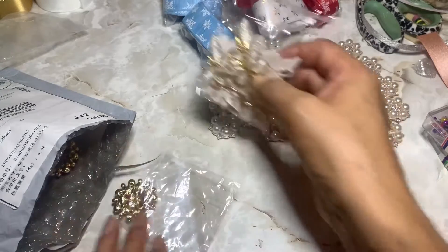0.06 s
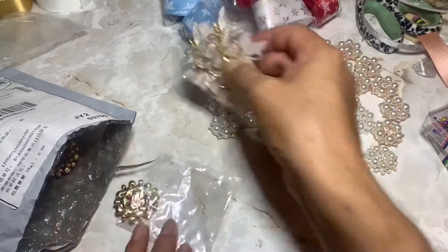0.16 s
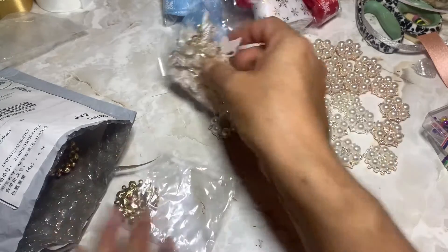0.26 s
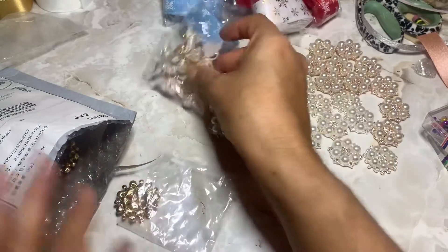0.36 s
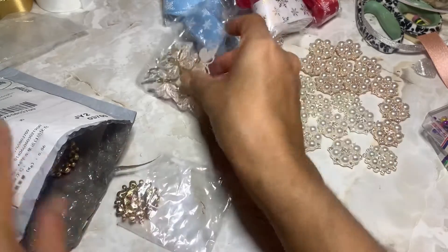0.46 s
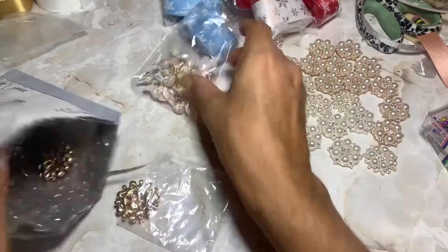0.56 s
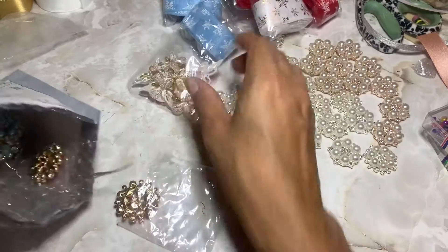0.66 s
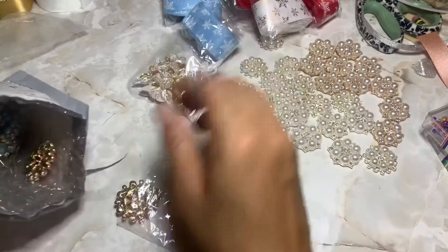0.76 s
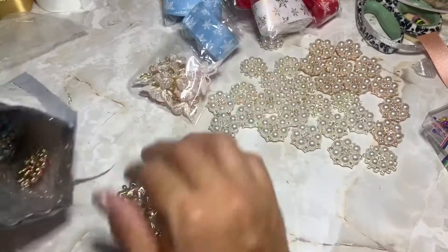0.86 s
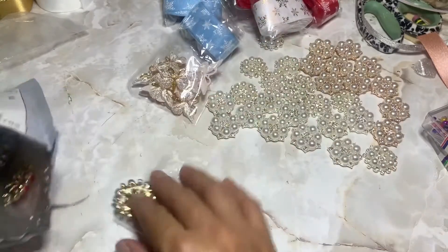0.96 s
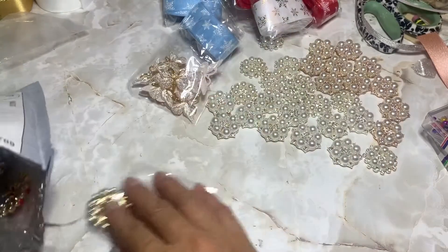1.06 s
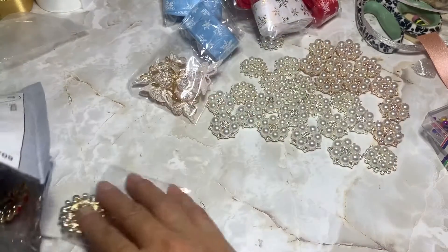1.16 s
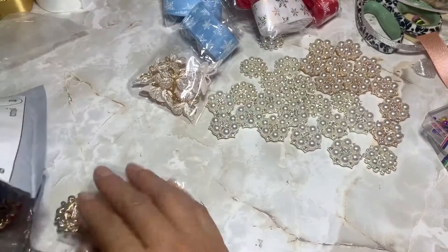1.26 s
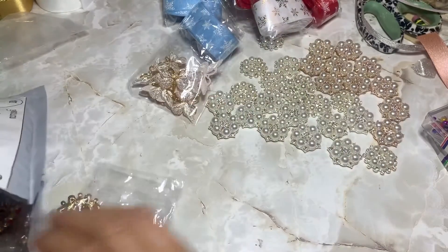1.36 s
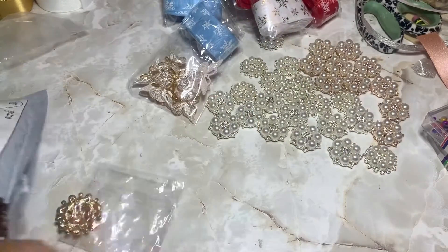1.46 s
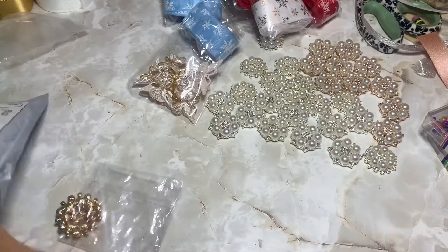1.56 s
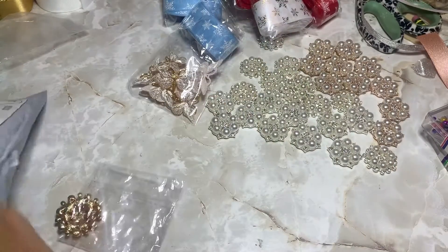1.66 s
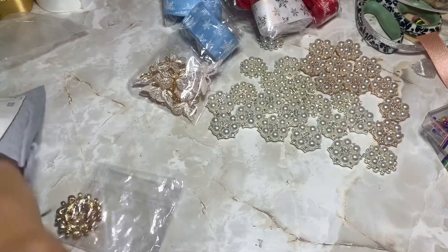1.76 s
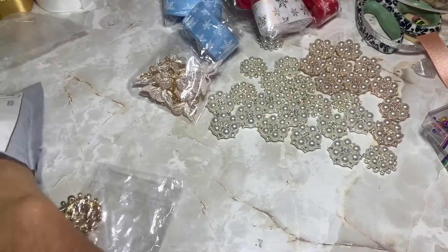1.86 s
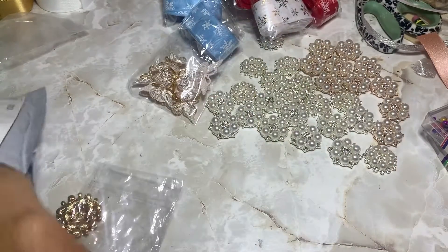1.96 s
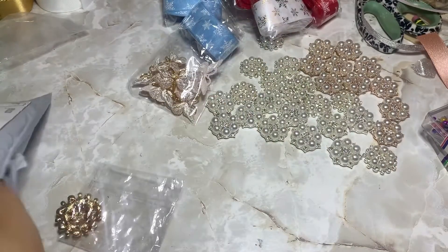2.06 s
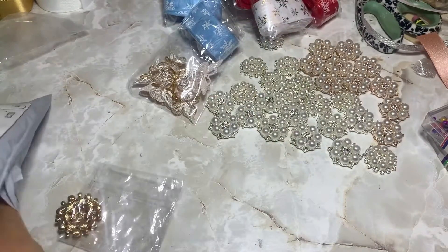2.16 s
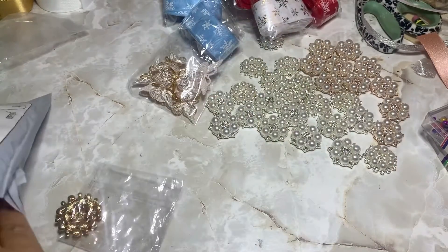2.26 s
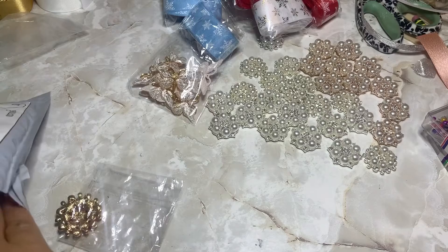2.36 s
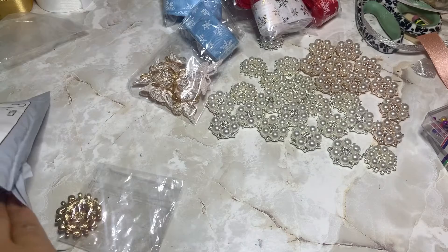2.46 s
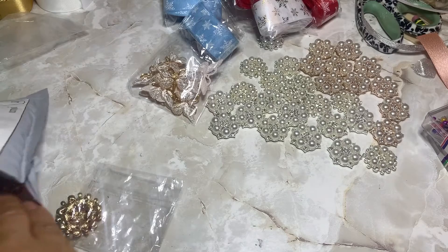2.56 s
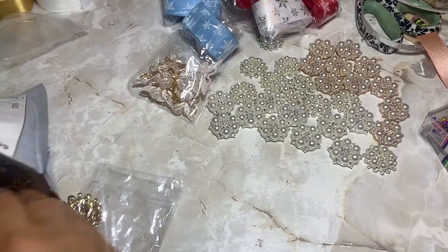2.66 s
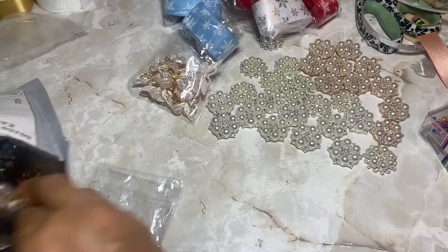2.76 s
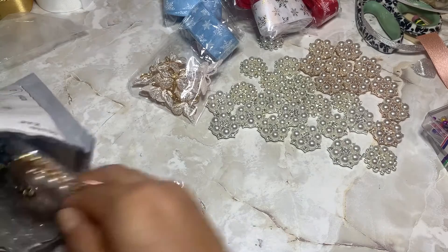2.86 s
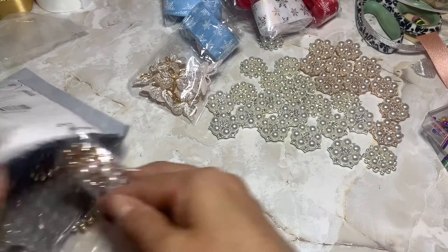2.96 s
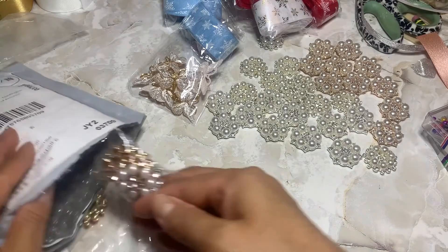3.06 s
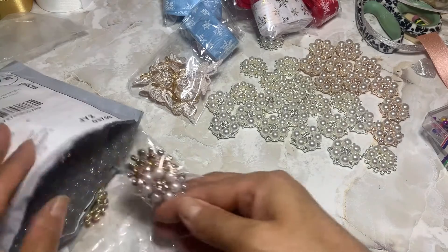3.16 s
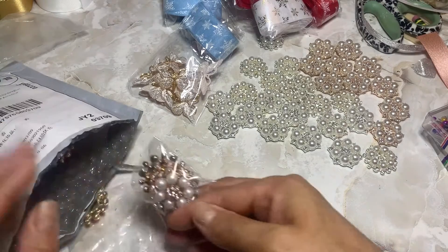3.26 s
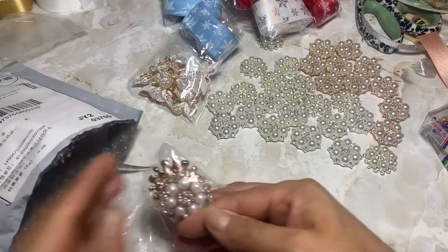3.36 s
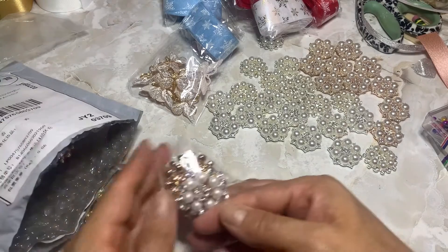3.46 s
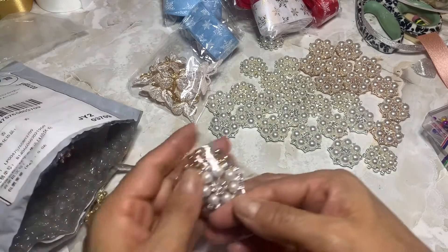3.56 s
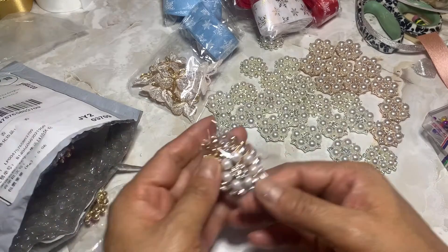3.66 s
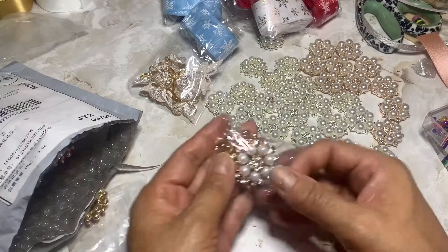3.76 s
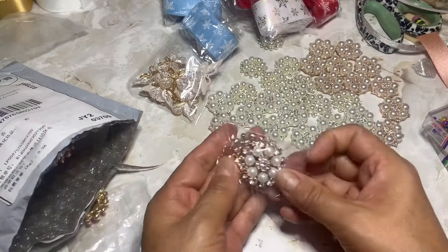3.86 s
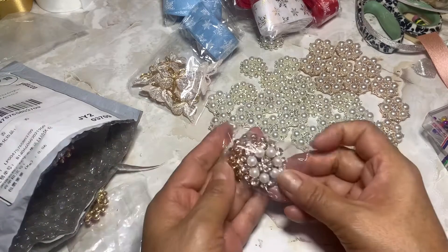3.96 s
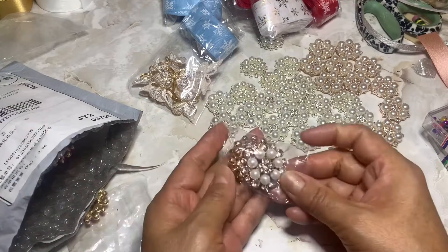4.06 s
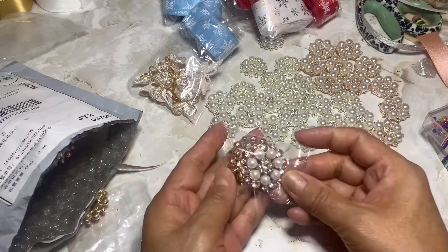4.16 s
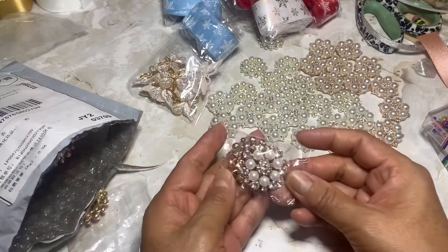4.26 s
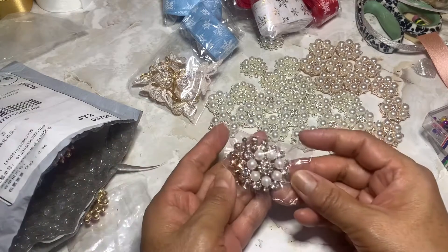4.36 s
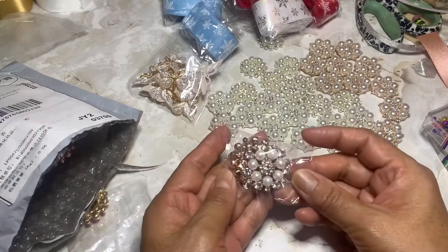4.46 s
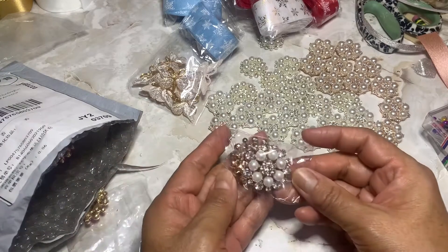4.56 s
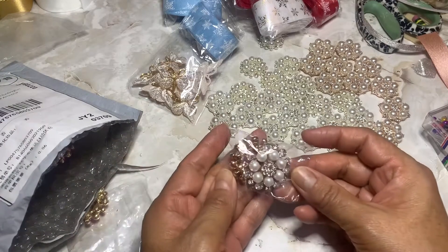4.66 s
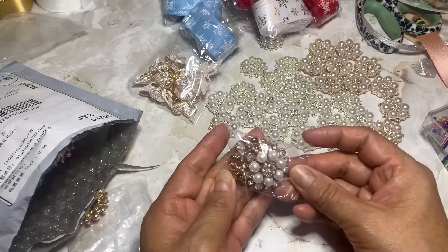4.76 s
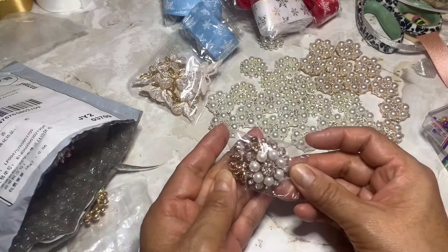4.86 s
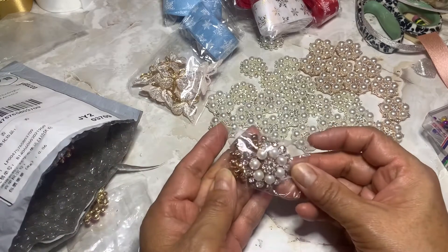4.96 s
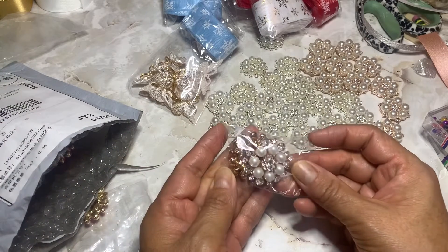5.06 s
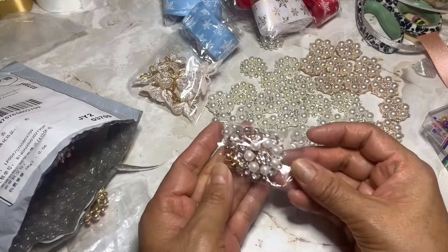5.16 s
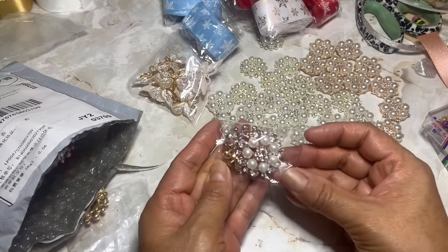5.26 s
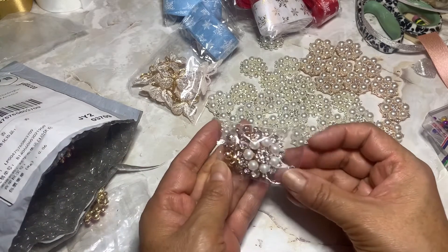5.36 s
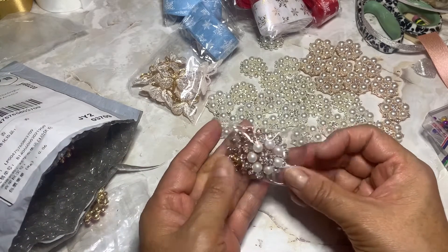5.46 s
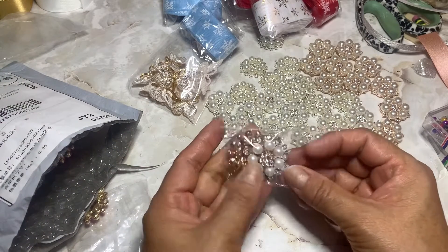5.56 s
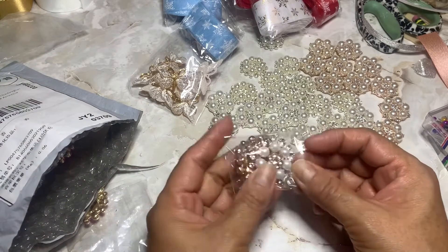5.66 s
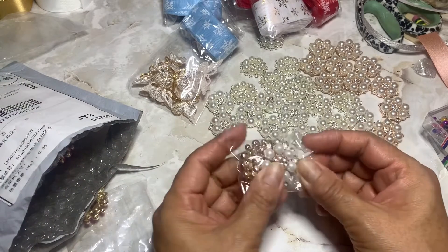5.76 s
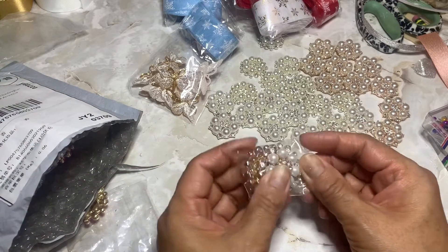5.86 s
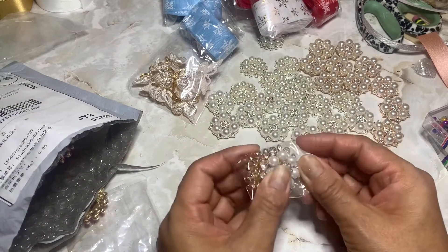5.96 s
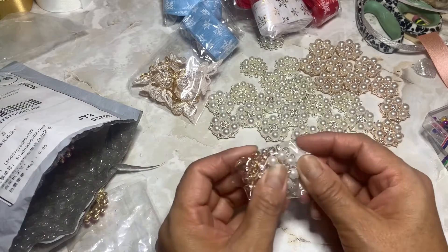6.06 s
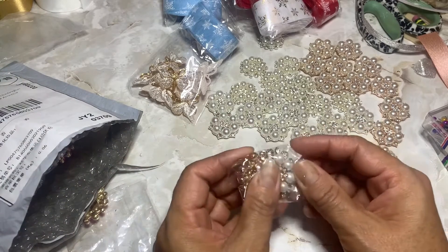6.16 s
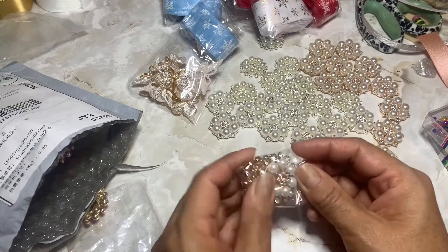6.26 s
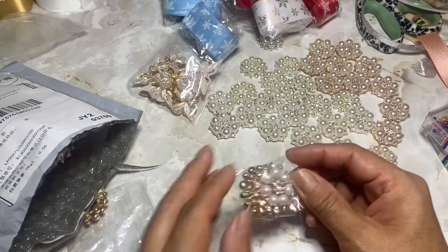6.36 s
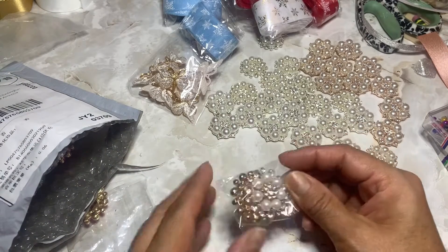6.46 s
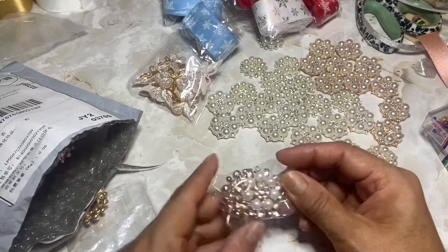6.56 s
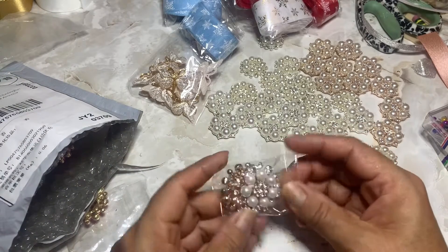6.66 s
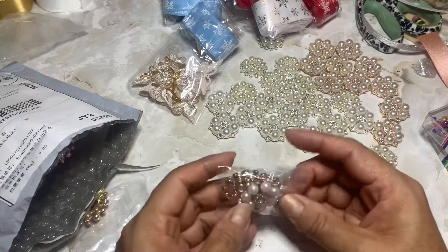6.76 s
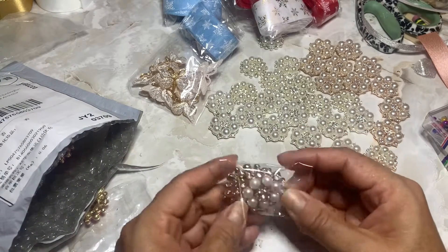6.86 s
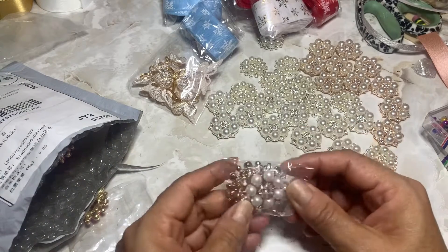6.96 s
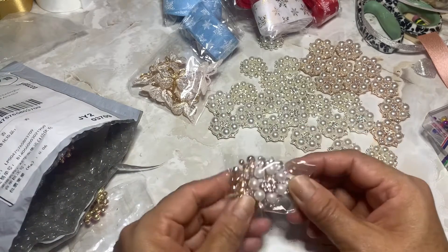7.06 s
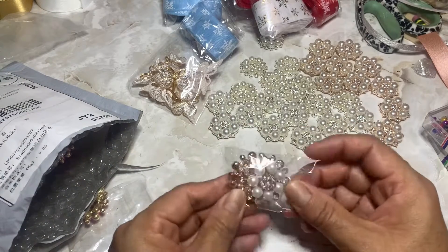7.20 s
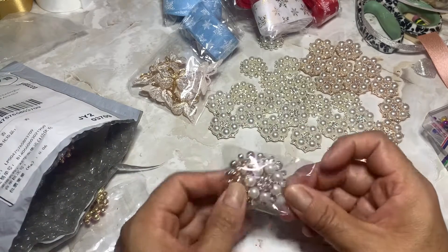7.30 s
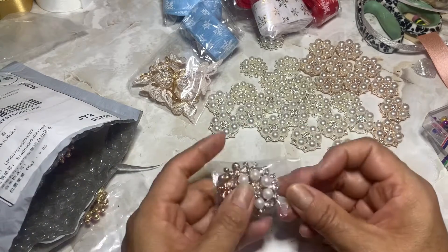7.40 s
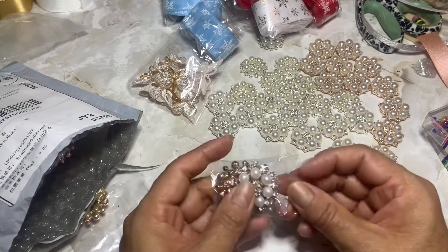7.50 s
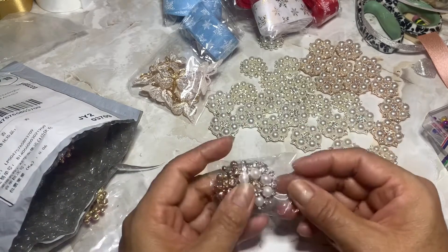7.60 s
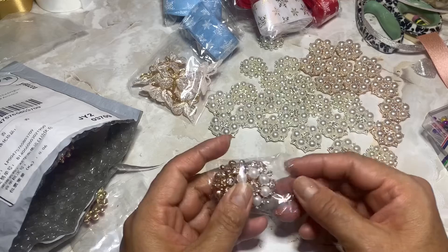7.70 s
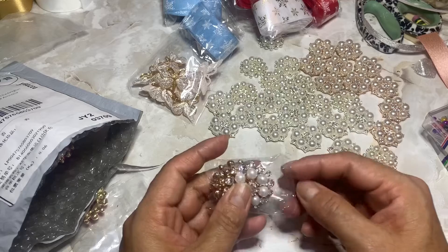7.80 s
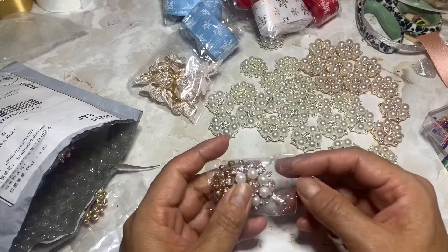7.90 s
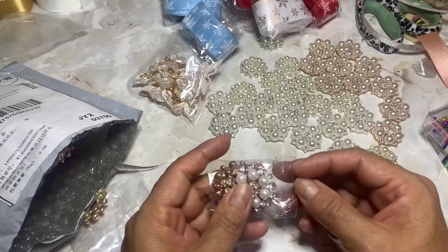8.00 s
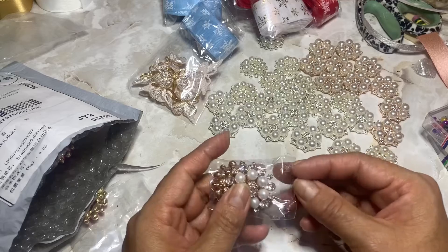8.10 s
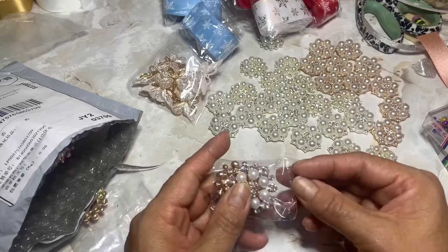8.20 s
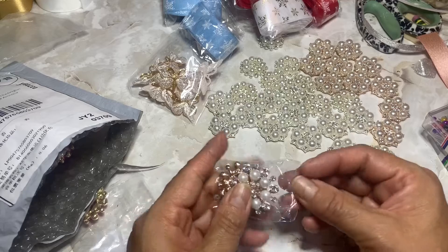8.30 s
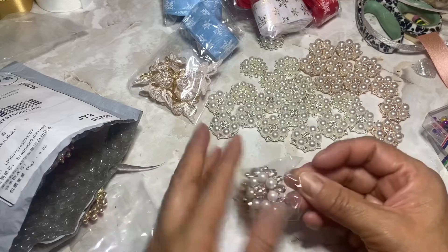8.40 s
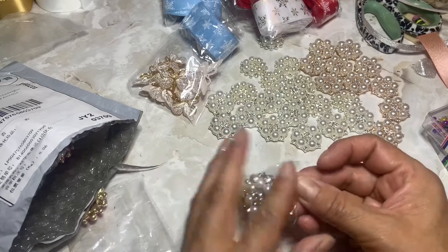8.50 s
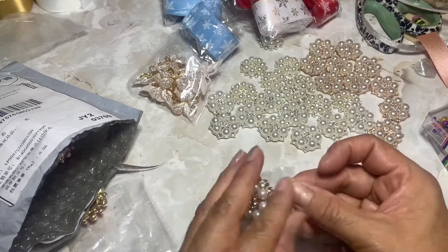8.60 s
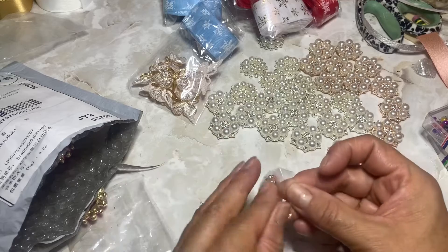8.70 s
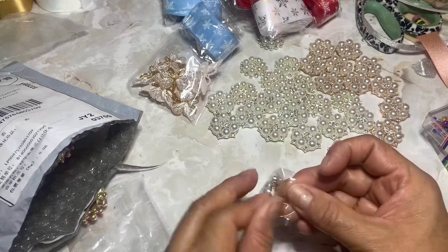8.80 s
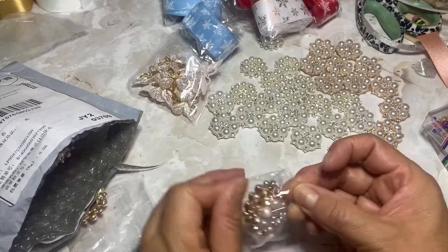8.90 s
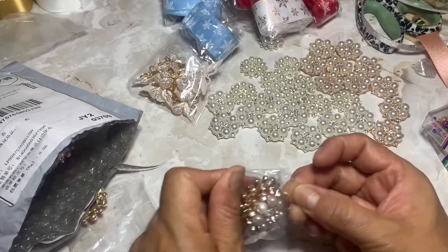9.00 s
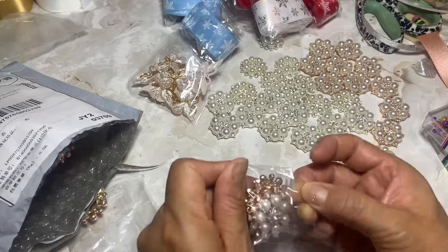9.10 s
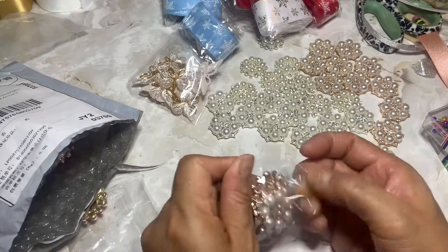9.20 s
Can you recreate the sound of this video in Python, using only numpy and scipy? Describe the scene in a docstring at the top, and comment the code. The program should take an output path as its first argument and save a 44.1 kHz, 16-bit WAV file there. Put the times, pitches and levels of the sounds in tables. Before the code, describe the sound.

Hands rummage dully in a padded mailer over a fading low rumble, then a small stiff plastic bag of beads crackles brightly in a quiet room.

```python
"""Hands rummage in a padded mailer at the left of a table, over a low rumble that mostly fades away.
Then they turn and crinkle a small stiff plastic bag of beads in the quiet room.
Each buckling crease is a short noise burst; sliding film is fine rustle made of tiny bursts and hiss.
Bumps and faint squeaks are short tones; the background is coloured noise. Two microphone ports give stereo."""
import sys
import numpy as np
from scipy import signal
from scipy.fft import rfft, irfft, next_fast_len
from scipy.io import wavfile
from scipy.ndimage import uniform_filter1d, map_coordinates

SR = 44100
rng = np.random.default_rng(int(sys.argv[2]) if len(sys.argv) > 2 else 0)


def store_wav(level_fs):
    """Save 16-bit WAV to argv[1]."""
    pcm = np.round(np.clip(np.atleast_2d(level_fs), -1, 1) * 32767)
    wavfile.write(sys.argv[1], SR, pcm.T.astype(np.int16))


N = 407484  # length of the scene in samples


def amp(db):
    """Turn a level in dB into a gain."""
    return 10 ** (np.asarray(db) / 20)


def unit(x):
    """Scale x to an average (rms) strength of 1."""
    return x / np.sqrt(np.mean(x ** 2) + 1e-20)


def along(points, hz):
    """Read a curve of (Hz, value) points on a log frequency axis."""
    point_hz, value = np.transpose(points)
    return np.interp(np.log(hz + 1), np.log(point_hz + 1), value)


def gains(rows):
    """One gain curve over time for each dB column, at -120 dB outside the table."""
    start_s, *columns = np.transpose(rows)
    t = np.arange(N) / SR
    return [amp(np.interp(t, start_s, level_db, left=-120, right=-120)) for level_db in columns]


def filtered(x, response):
    """Filter x by multiplying its spectrum with a response to frequency."""
    size = next_fast_len(N + 8192)
    hz = np.fft.rfftfreq(size, 1 / SR)
    return irfft(rfft(x, size) * response(hz), size)[..., :N]


def colour(points):
    """A filter with the tone colour of the points that never rings ahead of its sound."""
    def response(hz):
        # folding the cepstrum forward gives minimum phase
        cepstrum = irfft(np.log(amp(along(points, hz))))
        half = len(cepstrum) // 2
        cepstrum[1:half] *= 2
        cepstrum[half + 1:] = 0
        gain = np.exp(rfft(cepstrum))
        return gain / np.sqrt(np.mean(np.abs(gain) ** 2))  # unit mean power
    return response


def pair(shape, alike):
    """Left and right noise: likeness 1 means identical, 0 means unrelated."""
    turn = np.arccos(np.clip(alike, 0, 1)) / 2
    a, b = rng.standard_normal((*shape, 2)).T
    left = np.cos(turn) * a + np.sin(turn) * b
    right = np.cos(turn) * a - np.sin(turn) * b
    return np.array([left, right]).swapaxes(1, -1)


def hiss(spectrum, alike):
    """Steady coloured stereo noise of rms 1."""
    return unit(filtered(pair((N,), alike), lambda hz: amp(along(spectrum, hz))))


def swell(start_s, length_s):
    """A smooth hump of height 1."""
    done = (np.arange(N) / SR - start_s) / length_s
    return np.sin(np.pi * np.clip(done, 0, 1))


def background():
    """Three noise bands: a fading low drone, a murmur through the table and the air of the room."""
    # changing loudness: start_s, drone_db, table_db
    rumble_levels = [(0, -39, -49.5), (1.2, -50.5, -56), (2.3, -58, -55.5), (4.6, -67.5, -60.5),
                     (8.5, -68, -63.5), (8.65, -58, -56), (9.24, -71, -57.5)]
    # tone colours, as relative density: pitch_hz, level_db (per Hz)
    drone_colour = [(25, -55), (38, 0), (45, 27), (53, -22), (70, -75)]
    table_colour = [(40, -22.5), (62, 1.5), (125, -4.5), (165, -18), (250, -77)]
    air_colour = [(120, -60.5), (170, 11.5), (350, 8), (500, -2.5), (1500, -9), (12000, -62)]
    drone_gain, table_gain = gains(rumble_levels)
    low = drone_gain * hiss(drone_colour, alike=0.98) + table_gain * hiss(table_colour, alike=0.99)
    low = low * amp(1.2 * np.array([[-1], [1]]))  # a little stronger at the right
    return low + amp(-68.0) * hiss(air_colour, alike=0.49)


def tones(rows, wander):
    """Short sine tones, softly begun and ended, their phase wandering a little."""
    drift = wander * uniform_filter1d(rng.standard_normal(N), size=900)
    total = np.zeros(N)
    for start_s, length_s, pitch_hz, level_db in rows:
        wave = np.sin(2 * np.pi * pitch_hz * np.arange(N) / SR + drift)
        total += amp(level_db) * swell(start_s, length_s) * wave
    return total


def bumps():
    """Hands meet the table with short, mostly low tones."""
    # start_s, length_s, pitch_hz, level_db
    bump_rows = [(.97, 0.046, 83, -32), (1.745, 0.0066, 300, -35), (1.787, 0.036, 200, -37.5),
                 (8.62, 0.036, 63.5, -43), (8.9, 0.039, 245, -43.5), (9.15, 0.029, 72.1, -39)]
    return tones(bump_rows, wander=24.4)


def squeaks():
    """Brief, faint thin tones within the rustle."""
    # start_s, length_s, pitch_hz, level_db
    squeak_rows = [(2.17, .035, 1744, -45), (2.215, .09, 3289, -52), (3.12, .065, 4474, -53),
                   (6.65, .09, 408, -62)]
    return tones(squeak_rows, wander=10)


def room(x):
    """The room's answer: a noise tail whose frequencies each die at their own speed."""
    # pitch_hz, decay_s (time to fall by 60 dB)
    room_decay = [(300, 0.24), (8000, 0.035)]
    hz, t, z = signal.stft(pair((SR // 4,), alike=0.06), SR, nperseg=256)
    fading = amp(-60 * t / along(room_decay, hz)[:, None])
    tail = signal.istft(z * fading, SR, nperseg=256)[1]
    return signal.fftconvolve(x, tail / np.linalg.norm(tail[0]), axes=1)[:, :N]


def handling(held, gestures, shape):
    """Gain of the rustle: every gesture attacks, holds and releases over the level of just holding on."""
    attack, release, depth_db = shape
    gain = gains(held)[0]
    for start_s, length_s, level_db in gestures:
        first = max(round(start_s * SR), 0)
        last = min(round((start_s + length_s) * SR), N)
        t = np.arange(first, last)
        done = (t / SR - start_s) / length_s
        slope = np.maximum(1 - done / attack, 1 - (1 - done) / release)
        gain[t] += amp(level_db - depth_db * np.clip(slope, 0, 1))
    return gain


def bursts(peak_s, level_db, rise_ms, alike, tint_db):
    """Short noise bursts that swell and die; every crease has its own size, colour and place."""
    panel_hz = 888  # closest spacing of the resonances beside a crease
    aside_ms = .02  # how far creases scatter left and right, as a lead between the ports
    t = np.arange(400) / SR * 1000  # ms
    draw = rng.random((len(peak_s), 6))
    rise = rise_ms * (.6 + draw[:, :1])
    u = t / rise
    hz = np.fft.rfftfreq(len(t), 1 / SR)
    # broad hills in the spectrum, and ringing of the flat parts near the crease
    octave = np.log2(hz + 200)
    broad = np.cos(2 * np.pi * (draw[:, 1:2] + octave * (0.2466 + .5 * draw[:, 2:3])))
    spacing_hz = panel_hz * (1 + 2 * draw[:, 5:])
    panels = np.cos(2 * np.pi * (draw[:, 4:5] + hz / spacing_hz))
    tint = amp(tint_db * (broad + 0.67 * panels))
    ports = np.array([[[1]], [[-1]]])
    aside = np.exp(1j * np.pi * hz * aside_ms / 1000 * (2 * draw[:, 3:4] - 1) * ports)
    noise = irfft(rfft(pair((len(peak_s), len(t)), alike)) * tint * aside, len(t))
    shape = (u * np.exp(1 - u)) ** 3  # highest after the rise time
    rows = noise * shape
    # give each burst the energy that belongs to its level
    wanted = amp(level_db)[:, None] * np.linalg.norm(shape, axis=1, keepdims=True)
    rows = rows * wanted / np.sqrt((rows ** 2).sum(2).mean(0))[:, None]
    start = np.round(np.abs(peak_s[:, None] - rise / 1000) * SR).astype(int)
    at = start + np.arange(len(t))
    return np.array([np.bincount(at.ravel(), r.ravel(), N)[:N] for r in rows])


def big_snaps(snaps, alike, snap_db, body_db):
    """Creases buckle: a dry crack, a longer body from the wide panels, and two weaker creases close by."""
    start_s, level_db, low_db = np.transpose(snaps)
    peak_s = start_s + .0017  # from the start of a snap to its peak
    near = rng.random((len(peak_s), 2, 3))  # two weaker creases close by, mostly just after
    peak_s = np.append(peak_s, peak_s[:, None] + .03 * (near[..., 0] - .2))
    low_db = np.append(low_db, low_db[:, None] + 12 * near[..., 1])
    level_db = np.append(level_db, level_db[:, None] - 13 - 12 * near[..., 2])
    crack = bursts(peak_s, level_db + snap_db, rise_ms=0.752, alike=alike, tint_db=2.0)
    # wide panels flex longer
    body = bursts(peak_s, level_db + low_db + body_db, rise_ms=2.2, alike=np.sqrt(alike), tint_db=2.0)
    crack = filtered(crack, lambda hz: (hz / (hz - 1400j)) ** 2)  # low cut
    body = filtered(body, lambda hz: hz / (hz - 800j) / (1 + 1j * hz / 2200) ** 2)  # low and high cut
    return crack + body


def patchy(x, patchy_db):
    """Give x a colour that shifts as other parts of the film flex."""
    z = signal.stft(x, nperseg=256)[2]
    field = rng.standard_normal(z.shape[1:])
    field = uniform_filter1d(field, size=6, axis=0)  # smooth across pitch
    field = uniform_filter1d(field, size=8, axis=1)  # smooth across time
    return signal.istft(z * amp(patchy_db * unit(field)), nperseg=256)[1][:, :N]


def fine_rustle(effort, alike, spread_db, smooth, grain_ms, count):
    """A crowd of small bursts and sliding hiss follows the effort of the hand."""
    draw = rng.random((count, 2))
    size_db = -spread_db * np.log(draw[:, 1] + 0.12)  # many weak, few strong
    small = bursts(draw[:, 0] * N / SR, size_db, rise_ms=grain_ms, alike=alike, tint_db=6.0)
    # the film gives way in fits
    clumps = map_coordinates(rng.standard_normal(600), [np.linspace(0, 599, N)])
    mixed = unit(small) + smooth * pair((N,), alike)
    return effort * unit(amp(2.6 * clumps) * patchy(mixed, patchy_db=3))


def film(snaps, effort, spectrum, lead_ms, alike, spread_db, smooth, snap_db, body_db, grain_ms, count):
    """A plastic film in the room: snaps and rustle are coloured, echoed and placed towards the left."""
    big = big_snaps(snaps, alike, snap_db, body_db)
    rustle = fine_rustle(effort, alike, spread_db, smooth, grain_ms, count)
    direct = filtered(big + rustle, colour(spectrum))
    ports = np.array([[1], [-1]])
    with_echo = direct + amp(-12) * room(direct)
    # the left port hears it first
    return filtered(with_echo, lambda hz: np.exp(1j * np.pi * hz * lead_ms / 1000 * ports))


def mailer():
    """The thick envelope rustles dully; its padding rubs on the table, growing more slowly than the rustle."""
    # buckling creases, before the film's level shifts: start_s, level_db, body_db (over the level)
    mailer_snaps = [(0.0728, -30.5, -15), (0.1535, -20.5, -24), (0.2249, -25, -11), (0.3117, -26.5, -14.5),
                    (0.383, -31, -21), (0.4125, -26, -7.5), (0.4614, -27.5, -3.5), (0.5458, -30.5, -5),
                    (0.5791, -25, -10), (0.6784, -30.5, -13), (0.7163, -39, -47), (0.7906, -21.5, -36),
                    (0.9712, -16, -9.5), (0.9827, -9, -17.5), (1.1988, -27, -37), (1.2181, -23.5, -48),
                    (1.2504, -24, -45), (1.296, -36, -34), (1.3369, -19, -59), (1.4492, -51, -2),
                    (1.5803, -33, -41), (1.8417, -24.5, -13), (1.857, -29, -20), (1.9081, -34, -28),
                    (1.913, -22, -28), (1.962, -26, -5), (1.9814, -28, -11), (2.0088, -30.5, 3),
                    (2.0215, -29, 0.5), (2.1004, -31, 0), (2.2079, -19.5, -48), (2.5745, -28.5, -12),
                    (2.9038, -32.5, -7), (3.0228, -27, -12.5), (3.0969, -22, -43), (3.3004, -31.5, -25)]
    # rustle between the pushes: start_s, level_db
    mailer_held = [(0, -54.5), (.9, -52), (1.35, -62.5), (1.7, -48), (2.3, -59), (2.8, -54), (3.25, -67),
                   (3.45, -66.5)]
    # pushes of a hand into the mailer: start_s, length_s, level_db (at the height)
    mailer_pushes = [(-.02, 0.076, -44.5), (0.142, 0.063, -49.5), (0.377, 0.28, -45), (1.187, 0.084, -48.5),
                     (1.749, 0.52, -46.5), (1.91, 0.03, -65), (1.945, 0.023, -69), (1.997, 0.085, -46),
                     (2.078, 0.047, -43), (2.569, 0.28, -61.5), (2.838, 0.37, -49.5)]
    # one push: attack, release (shares of the length), depth_db (below the height at both ends)
    push_shape = (0.076, 0.39, 6.1)
    # dragged over the table: start_s, length_s, level_db
    mailer_drags = [(1.583, 0.76, -44), (3.372, 0.059, -55.5)]
    # tone colours, as relative density: pitch_hz, level_db (per Hz)
    mailer_colour = [(290, -27), (500, -6), (2890, -6), (4230, -3), (8670, -9), (10500, -8), (11800, -18),
                     (13400, -6), (15600, -52)]
    padding_colour = [(100, -32), (200, 19), (1000, -2), (3000, -19)]
    slide_colour = [(200, 0), (2300, 2.5), (4300, 1), (7000, -22)]
    effort = handling(mailer_held, mailer_pushes, push_shape)
    effort = effort + amp(-30) * swell(.955, .06) ** 2  # slapped down and crushed
    skin = film(mailer_snaps, effort, mailer_colour, lead_ms=0.283, alike=0.6, spread_db=4.5,
                smooth=0.75, snap_db=-4, body_db=12, grain_ms=.6, count=4000)
    drag_gain = sum(amp(level_db) * swell(start_s, length_s) ** 2
                    for start_s, length_s, level_db in mailer_drags)
    slide = drag_gain * hiss(slide_colour, alike=0.29)
    padding_gain = amp(-23.5) * effort ** 0.71 * (effort > 1e-5)
    return skin + slide + padding_gain * hiss(padding_colour, alike=0.72)


def bag():
    """The thin stiff bag crackles brightly between the fingers as its creases buckle."""
    # buckling creases, before the film's level shifts: start_s, level_db, body_db (over the level)
    bag_snaps = [(3.5411, -28.5, -18), (3.611, -24.5, -24), (3.6328, -23, -28), (3.6906, -19.5, -16.5),
                 (3.705, -16.5, -20), (3.8063, -28.5, -10), (3.8585, -17.5, -27), (3.8822, -25, -23),
                 (3.903, -19.5, -13.5), (3.913, -14, -19), (3.9311, -27, -18), (3.9835, -18, -14),
                 (4.0044, -25, -39), (4.0351, -21.5, -34), (4.127, -22.5, -57), (4.1921, -29, -36),
                 (4.2227, -20.5, -25.5), (4.2717, -28, -8), (4.2987, -21, -31), (4.349, -22, -43),
                 (4.3701, -28, -22.5), (4.4314, -37, -53), (4.5122, -33, -20.5), (4.5922, -33.5, -20),
                 (4.6444, -32.5, -23.5), (4.6698, -28, -14.5), (4.7227, -48, -5), (4.795, -50, -0.5),
                 (4.9223, -46, -13), (5.0066, -42.5, -11.5), (5.105, -23.5, -16), (5.1535, -33.5, -10),
                 (5.205, -24.5, -9), (5.228, -17, -16.5), (5.3108, -28.5, -15), (5.3625, -23, -19),
                 (5.4216, -25, -10.5), (5.5084, -24.5, -22), (5.5761, -21.5, -25), (5.6134, -16.5, -14.5),
                 (5.6432, -24.5, -31), (5.673, -19, -33), (5.69, -14, -34), (5.7314, -16, -29),
                 (5.7625, -18, -33), (5.811, -16.5, -35), (5.8678, -15, -39), (5.8813, -17, -38),
                 (5.9392, -17, -50), (5.9645, -24, -38), (5.983, -16.5, -32), (6.0421, -14.5, -33),
                 (6.0602, -21.5, -36), (6.077, -17, -35), (6.107, -14.5, -29), (6.1169, -19, -16.5),
                 (6.2555, -19, -33), (6.2884, -18.5, -16), (6.336, -11.5, -24.5), (6.386, -18.5, -16),
                 (6.4122, -21.5, -38), (6.4389, -15.5, -27.5), (6.562, -30.5, -2.5), (6.6, -18.5, -26),
                 (6.6237, -18, -16.5), (6.6626, -22, -37), (6.702, -19.5, -18), (6.765, -11, -16),
                 (6.8503, -19, -20), (6.9003, -10.5, -46), (6.9413, -19, -17), (6.9694, -14, -17),
                 (6.9882, -32, -28), (7.002, -14.5, -21), (7.0241, -15.5, -29), (7.0797, -32, -35),
                 (7.0962, -11.5, -30), (7.1169, -21, -14), (7.1383, -10.5, -49), (7.1635, -21, -8),
                 (7.1754, -17.5, -11.5), (7.2097, -33, -30), (7.246, -18.5, -23), (7.2873, -27, -33),
                 (7.4016, -19.5, -25), (7.4453, -18, -20), (7.4571, -12.5, -21), (7.5509, -10, -22.5),
                 (7.6939, -21, -11), (7.7337, -22, -18), (7.767, -25, -8), (7.8052, -18.5, -25),
                 (7.89, -31.5, -13.5), (7.9117, -22, -16.5), (7.9585, -25.5, -15), (7.9946, -19.5, -20),
                 (8.0488, -21, -24), (8.1901, -26.5, -25), (8.2925, -17.5, -34), (8.3692, -18.5, -12.5),
                 (8.3905, -19, -7), (8.4141, -13, -23), (8.4365, -42, -3), (8.4462, -15, -18),
                 (8.4773, -19.5, -11), (8.5329, -17.5, -8), (8.6025, -23.5, -12), (8.6161, -21.5, -17),
                 (8.6753, -18, -27), (8.7263, -19, -17), (8.7992, -17.5, -41), (8.8875, -20, -8),
                 (8.9215, -16, -9), (8.9633, -24.5, -4), (8.994, -23, -36), (9.0352, -24.5, -13),
                 (9.1223, -15.5, -40), (9.1402, -20, -43), (9.2226, -20, -8.5)]
    # rustle between the squeezes: start_s, level_db
    bag_held = [(3.45, -69.5), (3.77, -46.5), (4.43, -70.5), (5.05, -72.5), (5.5, -56), (6.6, -50.5),
                (7.7, -64), (8.2, -58), (8.7, -44.5), (9.24, -52.5)]
    # squeezes of the bag: start_s, length_s, level_db (at the height)
    bag_squeezes = [(3.534, 0.062, -49.5), (3.847, 0.089, -46), (3.942, 0.055, -54), (4.182, 0.23, -57.5),
                    (5.101, 0.15, -44), (5.419, 0.055, -43), (5.638, 0.27, -37.5), (5.786, 0.18, -51.5),
                    (6.065, 0.083, -39.5), (6.164, 0.057, -43), (6.239, 0.14, -36), (6.535, 0.3, -43.5),
                    (6.878, 0.15, -38.5), (7.055, 0.18, -38), (7.266, 0.16, -42), (7.457, 0.046, -52),
                    (7.519, 0.093, -45), (7.618, 0.2, -46), (7.867, 0.14, -47), (8.327, 0.15, -35.5),
                    (8.521, 0.15, -39), (8.753, 0.39, -48.5), (8.873, 0.085, -28.5), (9.036, 0.13, -36),
                    (9.183, 0.24, -36.5)]
    # one squeeze: attack, release (shares of the length), depth_db (below the height at both ends)
    squeeze_shape = (0.16, 0.077, 10.2)
    # tone colour, as relative density: pitch_hz, level_db (per Hz)
    bag_colour = [(410, -21.5), (700, -20.5), (1000, -7.5), (1330, -3), (2380, -5.5), (4000, -2),
                  (5080, -2.5), (8090, 1.5), (8870, -4.5), (10000, 0), (11700, -11), (13600, -3),
                  (16800, -40)]
    effort = handling(bag_held, bag_squeezes, squeeze_shape)
    return film(bag_snaps, effort, bag_colour, lead_ms=0.071, alike=0.73, spread_db=3.5,
                smooth=0.38, snap_db=-4, body_db=15.0, grain_ms=0.94, count=3200)


def scene():
    """The mailer and the bag, with squeaks and bumps, over the background."""
    return background() + bumps() + squeaks() + mailer() + bag()


def record(dry):
    """The recorder keeps nothing from 17 kHz up."""
    return filtered(dry, lambda hz: hz < 17000)


dry = scene()
out = record(dry)
store_wav(out)
```